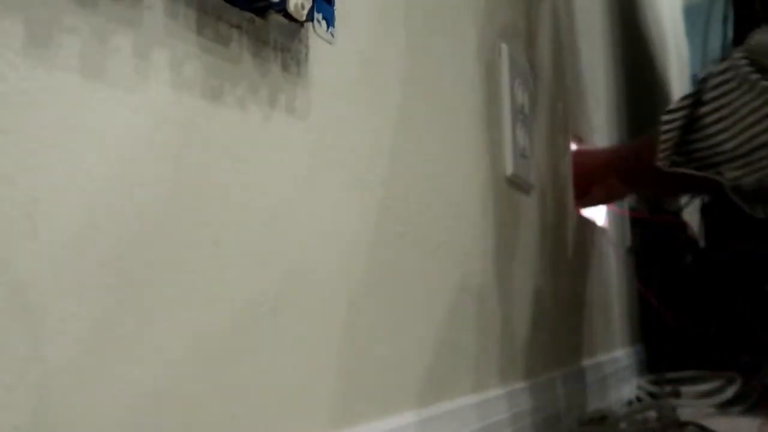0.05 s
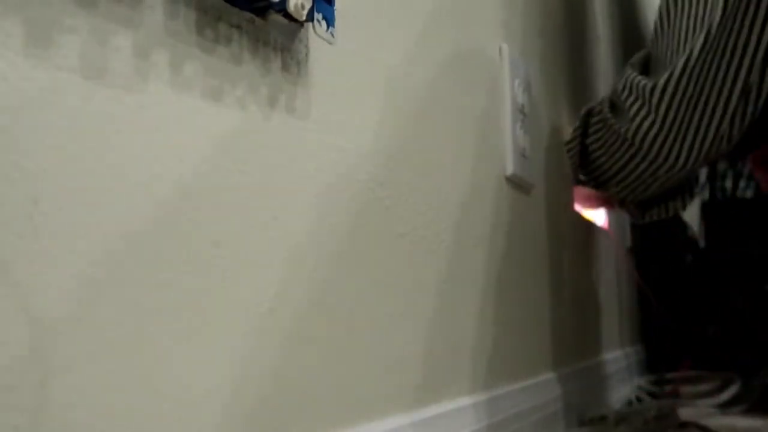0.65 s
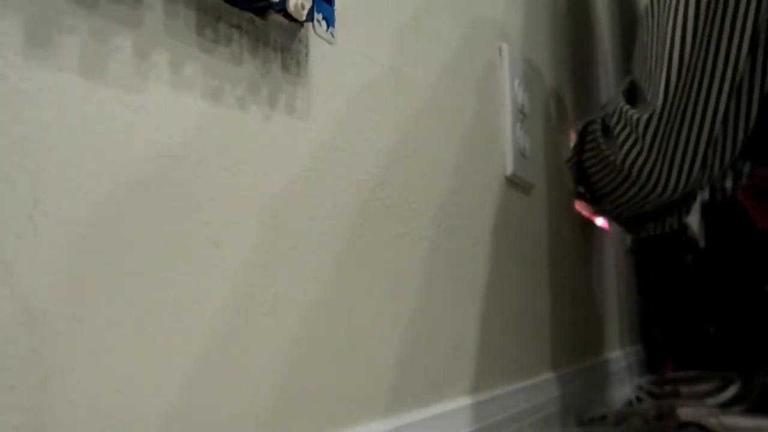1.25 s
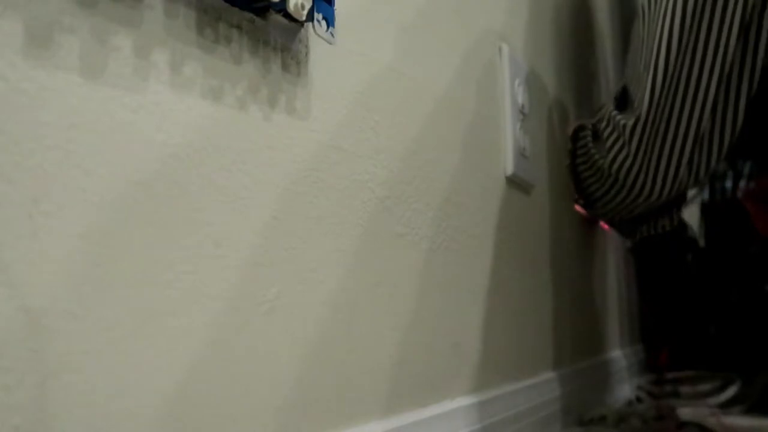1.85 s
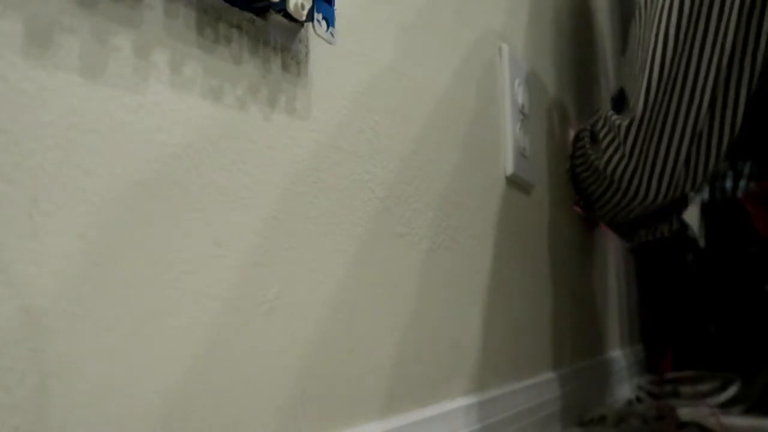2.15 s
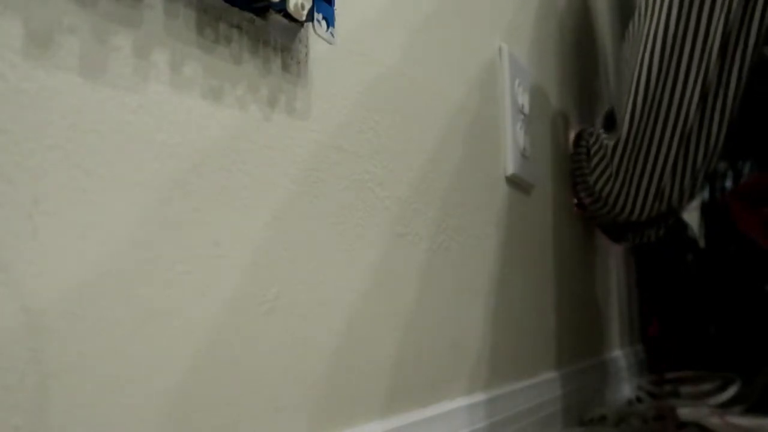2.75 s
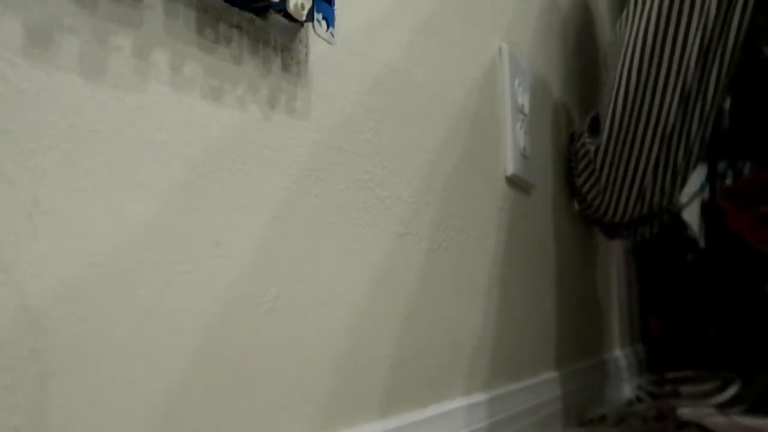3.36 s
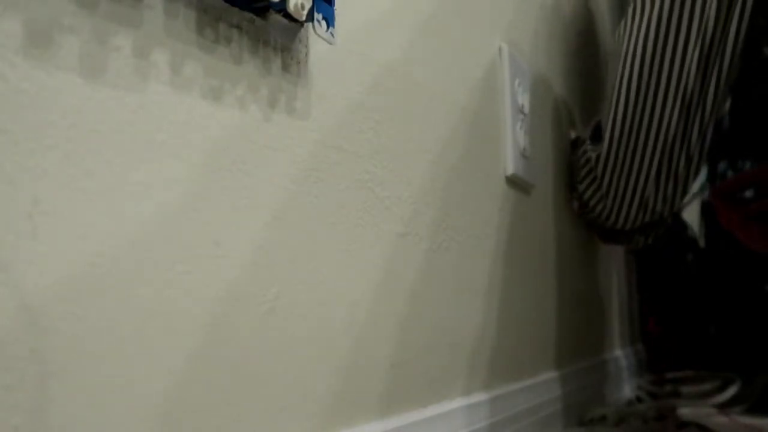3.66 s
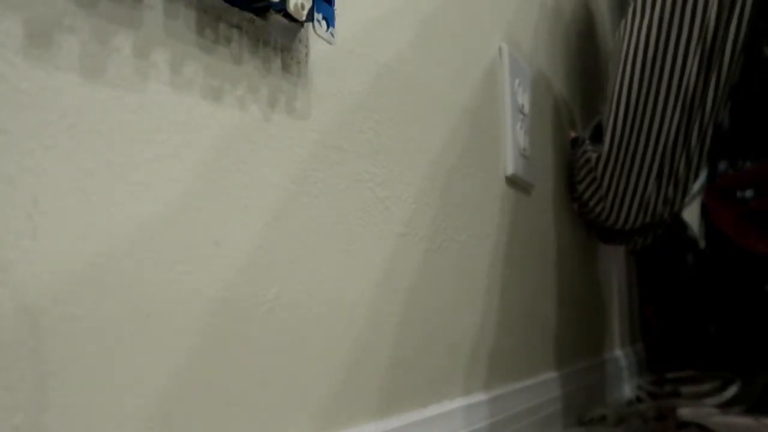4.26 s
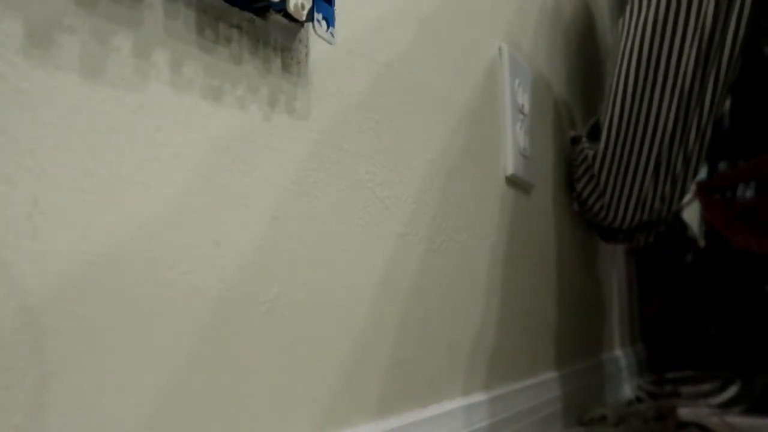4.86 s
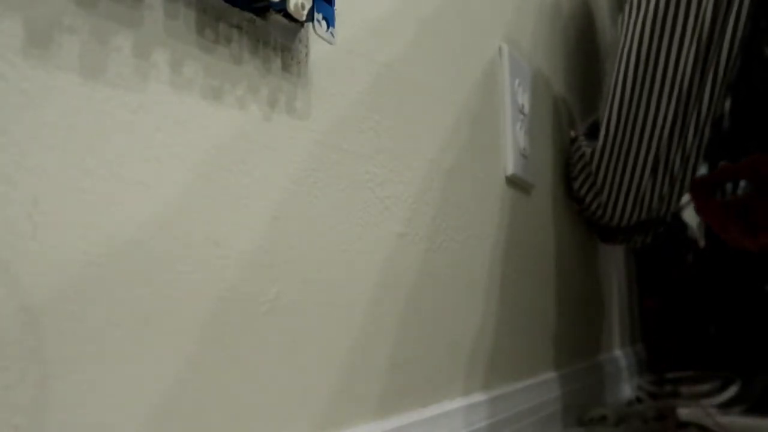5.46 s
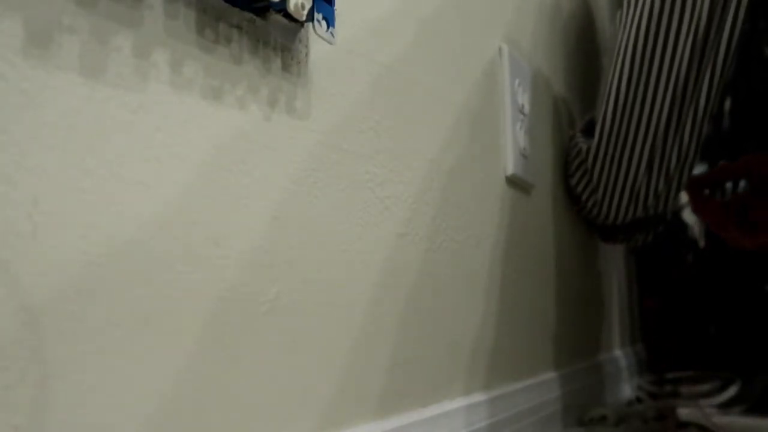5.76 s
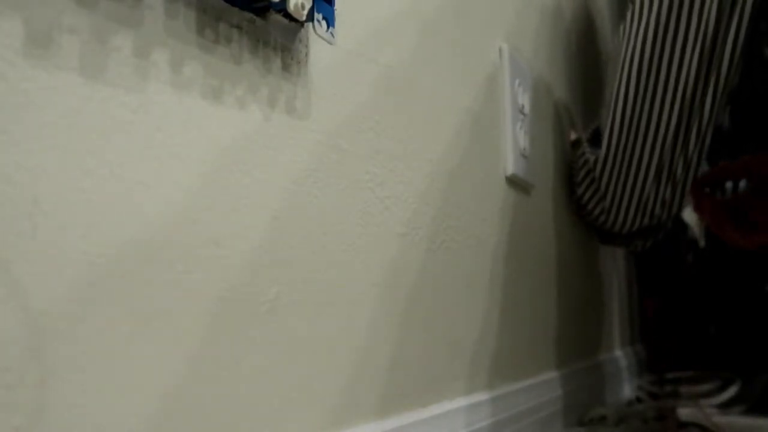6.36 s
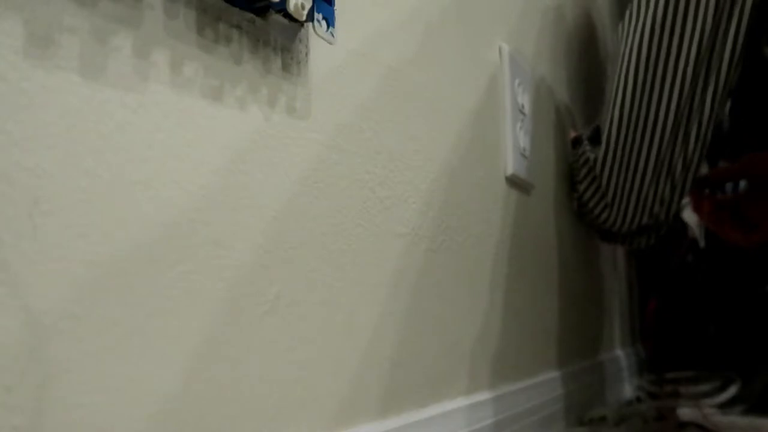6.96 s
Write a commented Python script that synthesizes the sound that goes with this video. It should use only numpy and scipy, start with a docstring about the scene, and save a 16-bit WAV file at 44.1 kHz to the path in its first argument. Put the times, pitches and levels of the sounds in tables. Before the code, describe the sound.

Irregular hollow knocks and dry clacks as a wooden shim is worked through a plasterboard wall, with light scraping and sleeve rustle.

```python
"""A wooden shim (a thin wedge) with a plastic ring is worked through a hole in a plasterboard wall.
Each knock makes the hollow wall boom and the wood clack. Between knocks the shim scrapes and chirps
on the edge of the hole, plaster crumbles, an arm leans on the board and its sleeve rustles.
Near the end the plastic sticks and slips in one short squeak. The room is small and quiet,
and a stereo recorder with a steady hiss stands nearby."""
import sys
import numpy as np
from scipy import signal
from scipy.fft import rfft, irfft
from scipy.io import wavfile
from scipy.ndimage import uniform_filter1d

SR = 44100
rng = np.random.default_rng(int(sys.argv[2]) if len(sys.argv) > 2 else 0)


def master(y):
    """Save y as 16-bit WAV."""
    cut = np.clip(np.atleast_2d(y).T, -1, 1)
    pcm = np.round(cut * 32767)  # scale
    wavfile.write(sys.argv[1], SR, pcm.astype(np.int16))


N = 317520
T = np.arange(N) / SR


def amp(db):
    """Turn decibels into a number to multiply by."""
    return 10 ** (np.asarray(db) / 20)


def unit(x):
    """Scale a sound to an average (rms) level of 1."""
    return x / np.sqrt(np.mean(x ** 2))


def unit_start(x):
    """Scale a sound so its first 20 ms have an average (rms) level of 1."""
    return x / np.sqrt(np.mean(x[:SR // 50] ** 2))


def fade(t, fade_s):
    """Die away by 60 dB in fade_s seconds."""
    return np.exp(-np.log(1000) * t / fade_s)


def add(track, start_s, sound):
    """Mix a sound into a track at start_s."""
    start = max(int(start_s * SR), 0)
    track[start:start + len(sound)] += sound[:N - start]


def colour(x, tone):
    """Make some pitches louder and others softer, following rows of pitch_hz, level_db."""
    hz, db = np.transpose(tone)
    bins_hz = np.maximum(np.fft.rfftfreq(len(x), 1 / SR), 1)
    gains = amp(np.interp(np.log(bins_hz), np.log(hz), db))
    return irfft(rfft(x) * gains, len(x))


def noise(tone):
    """Smooth noise with the given tone."""
    return unit(colour(rng.standard_normal(N), tone))


def wobble(per_s):
    """Glide to a new random value per_s times a second, straying about 1 from zero."""
    hold = int(SR / per_s)
    steps = np.repeat(rng.standard_normal(N // hold + 1), hold)
    return np.sqrt(3 / 2) * uniform_filter1d(steps, hold)[:N]


def grit(tone, per_s, scatter_db):
    """Grainy noise made of many tiny slips of uneven size."""
    slips = (rng.random(N) < per_s / SR) * rng.choice([-1, 1], N)
    sizes = amp(scatter_db * np.minimum(rng.exponential(size=N), 4))
    return unit(colour(slips * sizes, tone))


def spread(middle, twin, width):
    """Make stereo by adding an unrelated twin sound on the left and subtracting it on the right."""
    return middle + np.array([[1], [-1]]) * colour(twin, width)


# Tone of the background: pitch_hz, level_db
BACKGROUND_TONE = [(20, 7), (50, -34.5), (130, -2), (250, -7), (380, -2), (520, -7.5), (1400, -14),
                   (3000, -20), (5000, -24.5), (8000, -30), (12000, -37), (14500, -67.5)]
# How much its left and right differ: pitch_hz, width_db
BACKGROUND_WIDTH = [(60, -18), (200, 1.5), (380, 2), (700, 2.5), (15000, 4)]

def background(level_db=-56):
    """The quiet room and the recorder's steady hiss."""
    return amp(level_db) * spread(noise(BACKGROUND_TONE), noise(BACKGROUND_TONE), BACKGROUND_WIDTH)


# How loud the arm's rumble and the sleeve's rustle are over time: time_s, level_db
RUMBLE_LEVELS = [(0.0, -50.5), (0.66, -47.5), (0.82, -42.5), (1.38, -46), (1.66, -38), (1.86, -39.5),
                 (2.32, -43.5), (2.89, -44.5), (3.05, -35.5), (3.55, -41), (3.77, -37), (5.01, -39.5),
                 (5.19, -43), (5.43, -43), (5.83, -37.5), (6.13, -38), (6.24, -42), (7.2, -45)]
RUSTLE_LEVELS = [(0.0, -60.5), (0.55, -58), (0.72, -57.5), (0.95, -58), (1.32, -61), (1.6, -55.5),
                 (1.88, -62.5), (2.1, -57.5), (2.75, -63.5), (3.15, -60), (3.45, -62), (4.07, -61),
                 (5.5, -64), (5.92, -61), (6.24, -64.5), (7.2, -63.5)]
# Tone of the rumbling board and of the cloth: pitch_hz, level_db
RUMBLE_TONE = [(20, -9.5), (40, 3.5), (110, 5.5), (165, 3), (230, 5), (290, -4), (350, -3), (480, -18.5),
               (800, -68.5)]
RUSTLE_TONE = [(300, -35.5), (600, 0.5), (1400, 5.5), (2000, 2.5), (3100, 1.5), (4000, -3.5), (7000, -9.5),
               (14000, -22)]

def arm(rumble_db=-1, rustle_db=-1):
    """The forearm rumbles on the board while its sleeve brushes the wall."""
    press_db = np.interp(T, *np.transpose(RUMBLE_LEVELS))
    sleeve_db = np.interp(T, *np.transpose(RUSTLE_LEVELS))
    rumble = amp(press_db + rumble_db) * noise(RUMBLE_TONE)
    cloth = amp(1.2 * wobble(40)) * grit(RUSTLE_TONE, per_s=3000, scatter_db=2.5)
    return rumble + amp(sleeve_db + rustle_db) * cloth


def ring_share(crack_db, free_db=-45, halving_db=16.5):
    """The share of its ringing time a blow keeps: soft ones stay on the board and muffle it."""
    return np.clip(2 ** ((crack_db - free_db) / halving_db), .3, 1)


# The shim's knocks on the board, shared by booms, clacks and tocks (hum_db is relative to the boom):
# start_s, boom_db, boom_hz, crack_db, hum_db, clack_db, tock_db
KNOCKS = [(0.088, -44.5, 212, -67, -18, -58, -49.5), (0.372, -39.5, 247, -60, -25, -64, -51),
          (0.621, -18.5, 243.5, -44, -0.5, -31.5, -32.5), (0.887, -33, 252, -46.5, -14, -44.5, -40),
          (0.995, -28.5, 237, -60, 5, -41.5, -36), (1.25, -35, 227.2, -49, 7, -48, -56),
          (1.707, -29.5, 226, -59, 5, -34, -41), (1.808, -25.5, 248, -62, 4, -43.5, -38.5),
          (2.547, -36, 220, -45.5, 9, -45.5, -43.5), (2.848, -17, 250, -31.5, -6, -27, -27),
          (3.031, -42, 233, -40.5, 6, -39.5, -45.5), (3.149, -28.5, 200, -49.5, 9.5, -39, -39),
          (3.516, -34, 225, -57.5, -12, -45, -49), (3.56, -30, 251, -44.5, -7, -40, -39.5),
          (3.582, -12, 190.5, -37.5, -22, -34.5, -31.5), (3.775, -29.5, 181, -62.5, -1, -54, -62),
          (3.936, -31.5, 203, -54, 9, -47, -43), (4.024, -29.5, 274, -38, 5, -35, -49),
          (4.039, -20.5, 190, -39.5, -1, -41, -28.5), (4.309, -14, 244, -29, 9, -26.5, -20.5),
          (4.337, -15.5, 191, -66, -13, -29, -29.5), (4.883, -28.5, 226, -52, -13, -42, -44),
          (4.985, -33.5, 204, -54, 1, -49.5, -38), (5.445, -31.5, 226, -49.5, 5.5, -44, -43),
          (5.64, -28, 265, -44, -22, -35, -47), (5.66, -27, 254, -48, 8.5, -48, -29.5),
          (5.842, -44, 197, -56, -2, -39.5, -50), (5.903, -25, 230, -35, -5, -37.5, -34.5),
          (5.984, -27, 229, -50, -5, -44.5, -38), (6.125, -36.5, 236, -49, 15, -48.5, -55),
          (6.222, -30, 232, -54.5, -8, -45, -40.5), (6.431, -30, 247, -52, 2.5, -41.5, -35),
          (6.733, -40.5, 254, -54, -21, -48, -38.5)]
HARD_BLOW_DB = -27  # blows with a weaker crack than this build up more slowly
# Soft bumps of the hand or the bouncing shim, with no clack: start_s, boom_db, boom_hz
SOFT_BUMPS = [(0.628, -33.5, 89.5), (0.718, -32.5, 226), (0.99, -30, 123), (1.273, -26, 84.6),
              (1.745, -27.5, 108), (1.984, -32.5, 79.6), (2.227, -31.5, 100), (2.473, -35.5, 62),
              (2.574, -34, 127), (2.867, -24, 137), (2.92, -29, 253), (2.968, -35.5, 246),
              (3.162, -22, 119), (3.608, -23.5, 193.4), (3.871, -29, 116), (4.035, -27, 122),
              (4.064, -22, 209), (4.427, -21, 237), (4.489, -33.5, 234), (4.917, -29, 127),
              (5.011, -29.5, 89), (5.689, -33, 139), (6.44, -34, 135.3), (6.755, -31, 153),
              (6.828, -31.5, 96)]
# Low notes of the hollow wall when it rings freely: pitch_hz, level_db, fade_s
WALL_NOTES = [(44, 17.5, 0.66), (75, -0.5, 0.07), (110, 11, 0.075), (132, 5, 0.14), (187, 10, 0.096),
              (242.1, -0.5, 0.23), (273.5, -14, 0.27)]
# Standing waves, the notes that hum on after a boom: pitch_hz, level_db, fade_s
HUM_NOTES = [(113.5, -13, 0.99), (164, -31, 0.28), (176, -25, 0.95), (233.6, -11.5, 1), (256, -21.5, 0.44),
             (259, -18, 0.58)]

def booms(focus_octaves=0.41, hard_push_s=0.0027, lag_s=0.0026, patch_fade_s=0.15):
    """The board thuds, then hums; where and how softly it is hit decides which notes ring most."""
    out, t = np.zeros(N), T[:SR]
    wall_hz, wall_db, wall_fade_s = np.transpose(WALL_NOTES)
    hum_hz, hum_note_db, hum_fade_s = np.transpose(HUM_NOTES)
    wall_waves = np.sin(2 * np.pi * wall_hz[:, None] * t)
    hum_waves = np.sin(2 * np.pi * hum_hz[:, None] * t) * fade(t, hum_fade_s[:, None])
    bumps = [(*bump, -62, -10) for bump in SOFT_BUMPS]  # crack_db, hum_db: a soft hand leaves little hum
    for start_s, boom_db, boom_hz, crack_db, hum_db, *_ in [*KNOCKS, *bumps]:
        share = ring_share(crack_db)
        nearness = lambda hz: 1 / (1 + (np.log2(hz / boom_hz) / focus_octaves) ** 4)
        thud = (amp(wall_db) * nearness(wall_hz)) @ (wall_waves * fade(t, wall_fade_s[:, None] * share))
        # the struck patch of board rings at a pitch of its own
        patch = np.sin(2 * np.pi * boom_hz * t) * fade(t, patch_fade_s * share)
        hum = (amp(hum_note_db + hum_db) * nearness(hum_hz)) @ hum_waves
        push_s = hard_push_s * amp((HARD_BLOW_DB - crack_db) / 4)
        swing = (thud + amp(1) * (patch + hum)) * (1 - np.exp(-t / push_s))
        # the heavy board starts to move a moment after the blow
        add(out, start_s + lag_s, amp(boom_db) * unit_start(swing))
    return out


# Notes of the shim ringing against the board: pitch_hz, level_db, fade_s
SHIM_NOTES = [(580, 0, .18), (735, -1, .22), (772, -8, .17), (820, -9, .15), (931, -10, .15),
              (1000, -11, .17), (1210, -4, .2), (1238, -6, .2), (1268, -4, .19), (1327, -4, .18),
              (1382, -1, .19), (1480, -7, .13), (1567, -2, .15), (1882, -11, .15), (2100, -15, .13),
              (2480, -14, .12), (2725, -11, .11), (2843, -10, .13), (3002, -9, .11), (3230, -11, .08),
              (3300, -10, .07), (4070, -15, .1), (6800, -25, .08)]
# The grip tips the balance from the shim's second note toward its first: time_s, shift_db
GRIP_BALANCE = [(0.6, 6.5), (2.85, 8), (3.6, 10.5), (4.3, -1), (5.6, 10)]
# Tone of a knock's woody clack, brittle crack and high splintering: pitch_hz, level_db
CLACK_TONE = [(250, -12), (420, 6), (510, -2.5), (800, 4), (1100, -3), (1330, -4), (1560, -2), (1780, -8.5),
              (2000, -5.5), (2800, -29.5), (6000, -54.5)]
CRACK_TONE = [(900, -33), (1900, -11.5), (2700, 2), (3300, -1.5), (3650, -10), (4100, -3.5), (5000, -17.5),
              (7000, -25), (10000, -54), (15000, -43.5)]
SPLINTER_TONE = [(2500, -21.5), (4500, -2), (7000, 16.5), (10000, -6), (14500, -28)]

def clacks(clack_fade_s=0.27, crack_fade_s=0.069, splinter_fade_s=0.065, hard_rise_s=0.00082,
           ring_growth=0.28, splinter_growth=1.58):
    """Wood meets the board: plaster cracks and the shim rings, more clearly the harder the blow."""
    (woody, brittle, sharp, rings), t = np.zeros((4, N)), T[:SR // 4]
    hz, db, fade_s = np.transpose(SHIM_NOTES)
    for start_s, _, _, crack_db, _, clack_db, _ in KNOCKS:
        rise_s = hard_rise_s * amp((HARD_BLOW_DB - crack_db) / 2)
        rise = 1 - np.exp(-t / rise_s)
        add(woody, start_s, amp(clack_db) * rise * fade(t, clack_fade_s * ring_share(crack_db)))
        add(brittle, start_s, amp(crack_db) * rise * fade(t, crack_fade_s))
        add(sharp, start_s, amp(splinter_growth * crack_db) * rise * fade(t, splinter_fade_s))
        scatter, phase = rng.standard_normal((len(hz), 2)).T
        gains = amp(db + 2 * scatter)
        grip_db = np.interp(start_s, *np.transpose(GRIP_BALANCE))
        gains[:2] *= amp([grip_db, -grip_db])
        gains /= np.linalg.norm(gains)
        waves = np.sin(2 * np.pi * (hz[:, None] * t + phase[:, None])) * fade(t, fade_s[:, None])
        ring_db = clack_db + ring_growth * (crack_db - HARD_BLOW_DB)
        add(rings, start_s, amp(ring_db) * rise * (gains @ waves))
    crack = amp(-2) * brittle * grit(CRACK_TONE, per_s=2500, scatter_db=2)
    splinter = amp(-6) * sharp * noise(SPLINTER_TONE)
    clack = amp(-6.5) * woody * noise(CLACK_TONE)
    return clack + crack + splinter + amp(-0.5) * rings


# The board's higher notes, a hollow tock: pitch_hz, level_db, fade_s
TOCK_NOTES = [(315, -10, 0.16), (334.5, 0, 0.21), (374, 3.5, 0.086), (401.6, -5.5, 0.031),
              (441, -18.5, 0.045)]
# Light taps that stir only those notes: start_s, level_db
LIGHT_TAPS = [(0.292, -50.5), (0.469, -49), (1.689, -44), (3.214, -41), (3.285, -44), (3.34, -41.5),
              (3.812, -36.5), (3.85, -49), (4.915, -37), (5.031, -40.5), (5.069, -48), (5.94, -39),
              (6.791, -45)]

def tocks(gain_db=-1, scatter_db=2, detune=0.014, rise_s=0.0017):
    """Every knock and tap rings the board's higher notes, in a slightly different mix each time."""
    out, t = np.zeros(N), T[:SR // 3]
    hz, db, fade_s = np.transpose(TOCK_NOTES)
    knocks = [(start_s, tock_db) for start_s, *_, tock_db in KNOCKS]
    for start_s, level_db in knocks + LIGHT_TAPS:
        pitches_hz = hz * (1 + detune * rng.standard_normal(len(hz)))
        gains = amp(db + scatter_db * rng.standard_normal(len(hz)))
        waves = np.sin(2 * np.pi * pitches_hz[:, None] * t) * fade(t, fade_s[:, None])
        ring = (gains @ waves) * (1 - np.exp(-t / rise_s))
        add(out, start_s, amp(level_db + gain_db) * unit_start(ring))
    return out


# Scrapes along the edge of the hole: start_s, length_s, gritty_db, bright_db
SCRAPE_STROKES = [(0.321, 0.054, -77, -77), (0.782, 0.08, -48, -54), (1.361, 0.079, -51.5, -52.5),
                  (1.486, 0.052, -56.5, -56), (1.566, 0.19, -48, -57.5), (1.91, 0.16, -56.5, -60.5),
                  (2.038, 0.18, -59, -61), (2.29, 0.15, -73, -63), (2.462, 0.075, -49.5, -62),
                  (2.542, 0.068, -50, -58), (3.089, 0.071, -53.5, -57.5), (3.178, 0.13, -52, -62),
                  (3.315, 0.075, -52.5, -58), (3.782, 0.21, -51, -59), (4.565, 0.11, -52, -57.5),
                  (5.4, 0.078, -63, -60.5), (5.645, 0.074, -40.5, -54), (6.838, 0.03, -54.5, -52)]
# Tone of a scrape's gritty part and bright part: pitch_hz, level_db
GRITTY_TONE = [(250, -38), (420, -4), (500, -12.5), (580, 15), (680, 1), (950, 8.5), (1150, 0.5),
               (1450, 6.5), (1800, -4), (3000, -17.5), (6000, -47)]
BRIGHT_TONE = [(1000, -45), (2100, -3), (2650, 9.5), (3000, 5), (3400, 2), (3700, -4.5), (4100, -1),
               (5000, -12.5), (8000, -24), (14000, -39)]

def scrapes(gain_db=-1, judder_db=-3.0, shake_db=6):
    """The shim drags over crumbly plaster in short, jerky strokes that also shake the board."""
    gritty_level, bright_level = np.zeros((2, N))
    for start_s, length_s, gritty_db, bright_db in SCRAPE_STROKES:
        stroke = signal.windows.tukey(int(length_s * SR), .8)
        add(gritty_level, start_s, amp(gritty_db) * stroke)
        add(bright_level, start_s, amp(bright_db) * stroke)
    gritty = grit(GRITTY_TONE, per_s=1100, scatter_db=2.8)
    bright = grit(BRIGHT_TONE, per_s=1100, scatter_db=2.8)
    shake = amp(shake_db) * noise(RUMBLE_TONE)
    judder = amp(gain_db + judder_db * wobble(90))
    return judder * (gritty_level * (gritty + shake) + bright_level * bright)


# Thin chirps where the shim catches: start_s, length_s, pitch_hz, level_db, waver_share (of the pitch)
WOOD_CHIRPS = [(0.329, 0.042, 2180, -49.5, 0.12), (0.804, 0.047, 3170, -53, 0.14),
               (0.875, 0.026, 1335, -48, .015), (0.98, 0.024, 1325, -50, .015),
               (1.234, 0.021, 3200, -52.5, 0.072), (1.571, 0.036, 2900, -45, 0.13),
               (2.533, 0.027, 3160, -53, 0.092), (2.555, 0.08, 740, -45, 0.13),
               (2.849, 0.011, 3150, -32, 0.071), (3.929, 0.033, 2920, -46.5, 0.11),
               (4.036, 0.03, 5770, -47, 0.053), (5.846, 0.036, 1494, -46, 0.065),
               (5.898, 0.014, 1380, -36.5, 0.042)]

def chirps(gain_db=-1):
    """For an instant the wood sticks and slips at one high, unsteady pitch."""
    out = np.zeros(N)
    for start_s, length_s, pitch_hz, level_db, waver_share in WOOD_CHIRPS:
        n = int(length_s * SR)
        wavering_hz = pitch_hz * (1 + waver_share * wobble(1200)[:n])
        phase = 2 * np.pi * np.cumsum(wavering_hz) / SR
        add(out, start_s, amp(level_db + gain_db) * np.hanning(n) * np.sin(phase))
    return out


# Single strokes of the sleeve along the wall: start_s, length_s, level_db
SLEEVE_STROKES = [(0.788, 0.035, -56), (1.594, 0.14, -69), (1.916, 0.13, -61), (2.066, 0.085, -68),
                  (2.293, 0.29, -62.5), (3.153, 0.22, -60.5), (3.921, 0.036, -62), (4.599, 0.038, -57),
                  (5.65, 0.05, -67)]
# Tone of the sliding cloth: pitch_hz, level_db
SWISH_TONE = [(1500, -28.5), (3000, 6.5), (4300, -1), (5600, -2.5), (7200, -8.5), (9500, -13),
              (14000, -25.5)]

def swishes(gain_db=-1, flutter_db=3):
    """The cloth slides along the paint in short, airy strokes."""
    strokes = np.zeros(N)
    for start_s, length_s, level_db in SLEEVE_STROKES:
        add(strokes, start_s, amp(level_db) * signal.windows.tukey(int(length_s * SR), .8))
    return strokes * amp(gain_db + flutter_db * wobble(70)) * noise(SWISH_TONE)


# Plaster gives way in a run of little breaks: start_s, length_s, level_db, trickle_db
PLASTER_CRUNCHES = [(1.61, 0.099, -56.5, -66), (2.845, 0.029, -47, -61), (4.305, 0.018, -33.5, -41),
                    (5.642, 0.052, -51, -55), (5.898, 0.019, -49.5, -49), (5.98, .016, -52, -60.5)]
# Tone of the breaking plaster and of the falling crumbs: pitch_hz, level_db
CRUMBLE_TONE = [(500, -20), (1000, 5), (1350, 7), (2000, -3), (3000, 6.5), (4000, -5), (5200, -12),
                (7000, -13), (9000, -23), (14000, -33)]
TRICKLE_TONE = [(400, -15), (750, 10), (1300, 8.5), (2000, -3), (3000, -7.5), (4200, -11.5), (7000, -18.5),
                (14000, -43)]

def crunches(lumpy_db=-2.0, trickle_fade_s=0.58):
    """The edge of the hole caves in lump by lump, then crumbs trickle down, duller and farther apart."""
    (caving, trickle), t = np.zeros((2, N)), T[:SR // 3]
    for start_s, length_s, level_db, trickle_db in PLASTER_CRUNCHES:
        add(caving, start_s, amp(level_db) * signal.windows.tukey(int(length_s * SR), .2))
        add(trickle, start_s + length_s, amp(trickle_db) * fade(t, trickle_fade_s))
    breaks = grit(CRUMBLE_TONE, per_s=3500, scatter_db=1.5)
    crumbs = grit(TRICKLE_TONE, per_s=350, scatter_db=2)
    return amp(lumpy_db * wobble(350)) * caving * breaks + trickle * crumbs


# Bits of plaster snap off the edge of the hole: start_s, level_db, pitch_hz, fade_s
PLASTER_SNAPS = [(1.705, -36, 2860, 0.023), (1.708, -40.5, 1100, 0.059), (2.473, -43, 1610, 0.048),
                 (2.548, -48, 2700, .04), (3.582, -53, 5500, 0.11), (4.037, -53, 5430, 0.067),
                 (4.04, -36, 1170, 0.14), (2.8474, -40, 4270, .035), (2.8485, -30, 1550, 0.049),
                 (3.583, -30.5, 988, 0.055), (5.638, -40, 1400, 0.027), (5.662, -45, 1060, .07),
                 (5.688, -44, 1500, 0.043), (4.309, -32, 1320, 0.06), (4.3133, -32.5, 2900, 0.057),
                 (4.323, -36, 2720, 0.055), (4.3263, -28, 1400, .04), (4.924, -44, 890, 0.046),
                 (5.844, -44.5, 2730, 0.08)]

def snaps(gain_db=-1, slope_db=-13, breaks_per_s=4000):
    """A crumb of plaster snaps in a quick burst of tiny breaks, about an octave wide."""
    out, t = np.zeros(N), T[:SR // 5]
    for start_s, level_db, hz, fade_s in PLASTER_SNAPS:
        breaks = rng.standard_normal(len(t)) * (rng.random(len(t)) < breaks_per_s / SR)
        tone = [(hz / 8, 4 * slope_db), (hz / 2, slope_db), (hz, 0),
                (hz * 2, 2 * slope_db), (hz * 8, 4 * slope_db)]
        add(out, start_s, amp(level_db + gain_db) * unit(colour(breaks, tone)) * fade(t, fade_s))
    return out


# Small dry ticks near the microphone: start_s, level_db, pitch_hz
CLOSE_TICKS = [(1.708, -55, 8440), (1.7105, -27.5, 970), (2.68, -31, 1050), (2.6823, -36, 2810),
               (3.567, -41, 9560), (3.571, -41.5, 11100), (4.924, -41, 870), (6.224, -33.5, 3100),
               (6.225, -44, 9900), (6.85, -41, 11000)]

def ticks(ring_cycles=14.0):
    """Light ticks that die away within a few vibrations."""
    out, t = np.zeros(N), T[:SR // 20]
    for start_s, level_db, hz in CLOSE_TICKS:
        add(out, start_s, amp(level_db) * np.sin(2 * np.pi * hz * t) * fade(t, ring_cycles / hz))
    return out


# One short squeak that jumps between a higher and a lower note: time_s, pitch_hz, level_db
SQUEAK_PATH = [(6.823, 1540, -62), (6.828, 1620, -49), (6.832, 1720, -43), (6.836, 1640, -44),
               (6.8375, 1510, -39), (6.8405, 1490, -42), (6.8415, 1275, -44), (6.847, 1275, -42),
               (6.848, 1600, -42), (6.852, 1690, -42), (6.8535, 1330, -46), (6.858, 1290, -49),
               (6.861, 1600, -49), (6.869, 1560, -60)]
# Its harmonics, at 1, 2, 3... times the pitch: level_db
SQUEAK_HARMONICS = [2.5, 2, -5, -15, -21, -24, -26, -28]
# Tone that the plastic ring's body gives it: pitch_hz, level_db
PLASTIC_TONE = [(1200, 1), (1700, -1), (2500, -5), (3000, 1.5), (3800, 1), (4500, -4), (5200, -11),
                (7000, -3)]

def squeak(gain_db=-3.0):
    """The plastic sticks and slips fast enough to make a note, ever more unevenly until it lets go."""
    time_s, pitch_hz, level_db = np.transpose(SQUEAK_PATH)
    waver_share = np.interp(T, time_s[[0, -1]], [.018, .085])
    wavering_hz = np.interp(T, time_s, pitch_hz) * (1 + waver_share * wobble(1100))
    phase = 2 * np.pi * np.cumsum(wavering_hz) / SR
    note = sum(amp(db) * np.sin(k * phase) for k, db in enumerate(SQUEAK_HARMONICS, 1))
    flutter = amp(2.5 * wobble(700))
    loudness = np.interp(T, time_s, amp(level_db + gain_db), left=0, right=0)
    return loudness * unit(colour(note * flutter, PLASTIC_TONE))


# The wall's low sounds thrown back by the room's surfaces: delay_s, gain
BASS_ECHOES = [(.0260, 0.52), (.0400, 0.26), (.0712, .25)]

def echoes(wall):
    """Each surface sends back a later, quieter copy of the sound."""
    out = np.zeros(N)
    for delay_s, gain in BASS_ECHOES:
        add(out, delay_s, gain * wall)
    return out


# How much left and right differ in the room's ring: pitch_hz, width_db
ROOM_WIDTH = [(60, -36), (200, -50), (380, -7), (700, -24), (1300, -17), (2400, -12), (4400, -5), (8000, 8)]

def room(x, low_fade_s=0.66, mid_fade_s=0.41, top_fade_s=0.099, build_s=0.0006):
    """Many echoes blur into a tail, longer in the bass and wider in the treble."""
    t = T[:SR]
    lowpasses = [signal.butter(2, hz, fs=SR, output="sos") for hz in (480, 5000)]
    tails = np.zeros((2, SR))
    for tail, white in zip(tails, rng.standard_normal((2, SR))):
        low, below_top = (signal.sosfilt(lowpass, white) for lowpass in lowpasses)
        mid, top = below_top - low, white - below_top
        for band, db, fade_s in [(low, -15, low_fade_s), (mid, -4, mid_fade_s), (top, -6, top_fade_s)]:
            decay = fade(t, fade_s)
            tail += amp(db) * band * decay / np.linalg.norm(decay)
    response = spread(*tails, ROOM_WIDTH) * (1 - np.exp(-t / build_s)) * (t < .9)
    return signal.fftconvolve(x[None], response, axes=1)[:, :N]


def microphones(x, lag_s=.000024, left_treble_db=1.6):
    """Direct sound reaches the left microphone a moment before the right, and a little brighter."""
    delay = np.exp(-2j * np.pi * np.fft.rfftfreq(N, 1 / SR) * lag_s)
    right = irfft(rfft(x) * delay, N)
    treble = signal.sosfilt(signal.butter(1, 600, "high", fs=SR, output="sos"), x)
    left = x + (amp(left_treble_db) - 1) * treble
    return np.array([left, right])


def scene(boom_db=-1, close_in_room_db=-10):
    """Work at the wall, heard directly and through the room, over a quiet background."""
    wall = amp(boom_db) * booms() + tocks()
    work = wall + clacks() + snaps() + crunches() + scrapes() + chirps() + arm() + swishes()
    close = squeak() + ticks()
    direct = microphones(work + close + echoes(wall))
    return direct + background() + room(work + amp(close_in_room_db) * close)


def record(dry, top_hz=14800):
    """The recorder cuts off the highest treble."""
    return signal.sosfilt(signal.ellip(8, .2, 70, top_hz, fs=SR, output="sos"), dry)


dry = scene()
out = record(dry)
master(out)
```